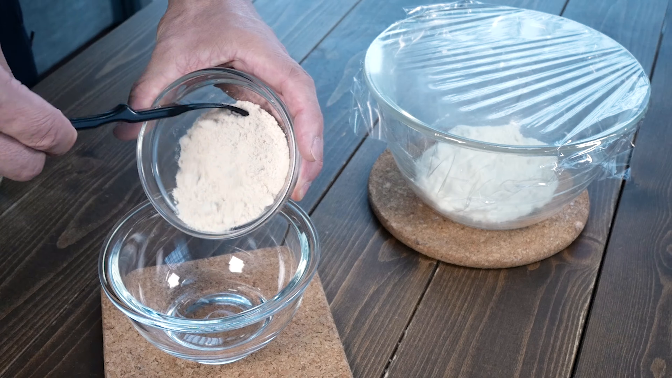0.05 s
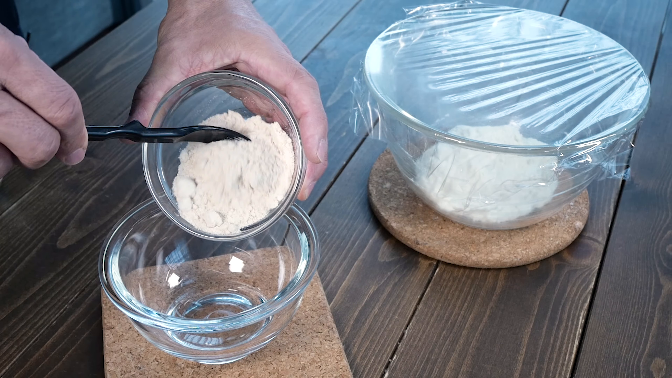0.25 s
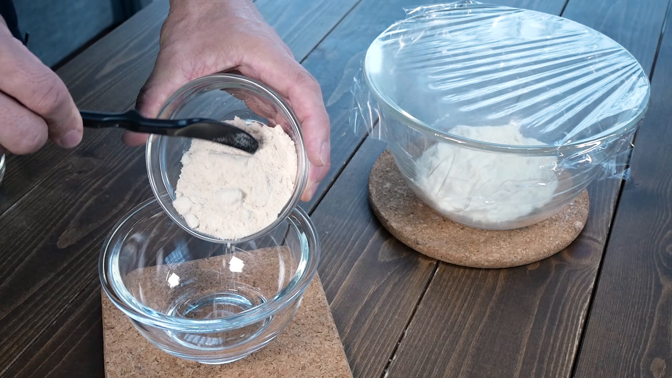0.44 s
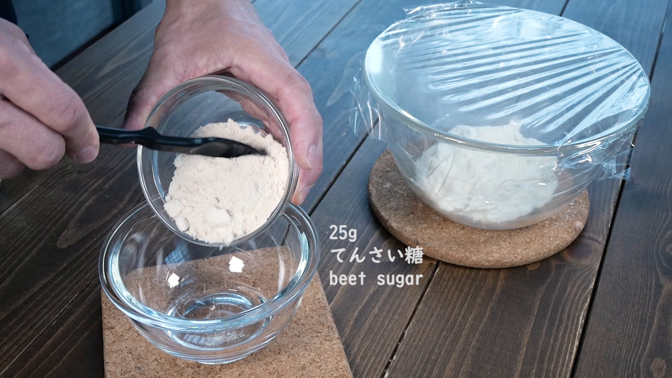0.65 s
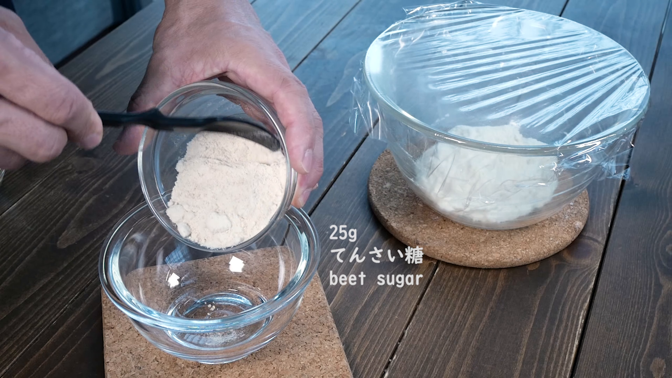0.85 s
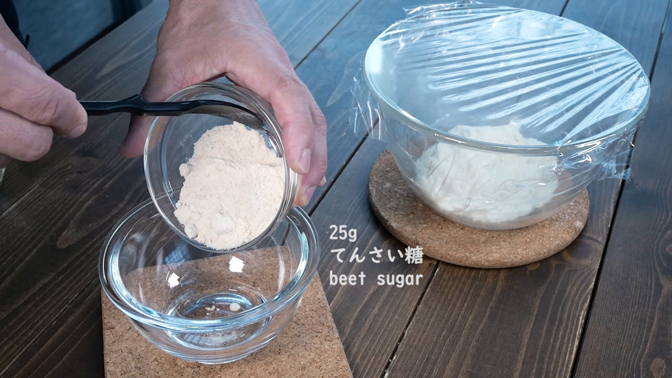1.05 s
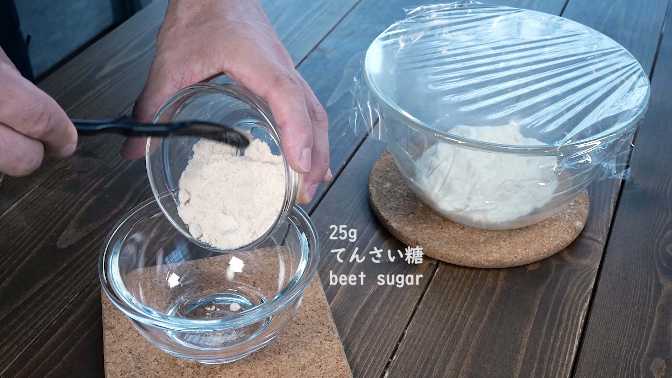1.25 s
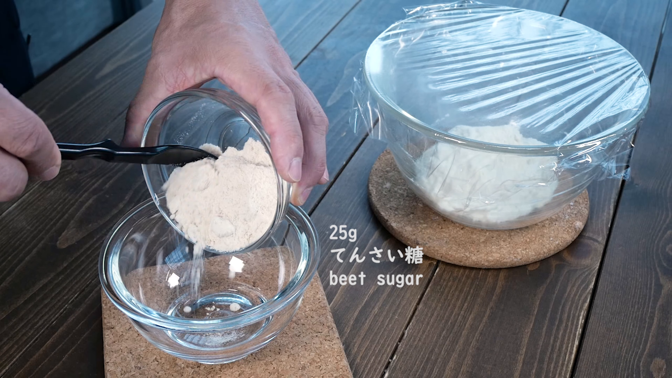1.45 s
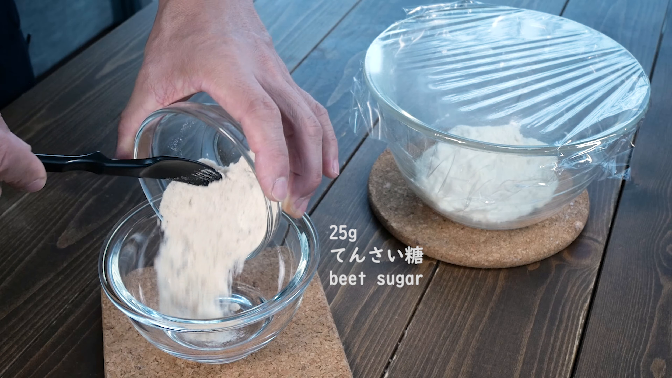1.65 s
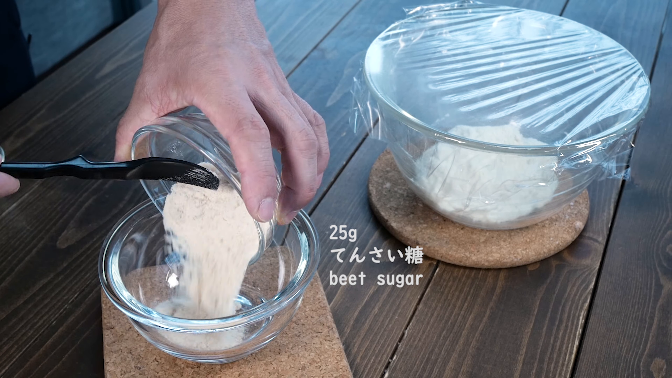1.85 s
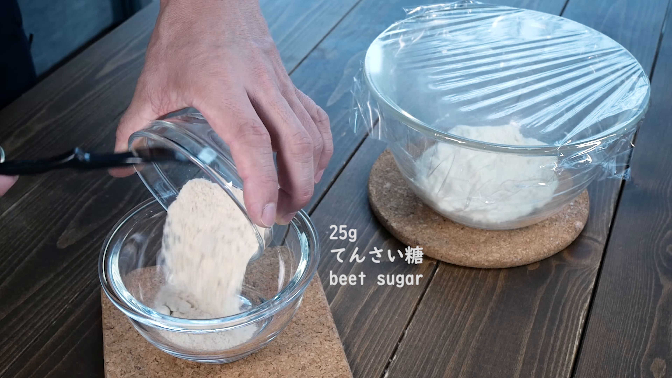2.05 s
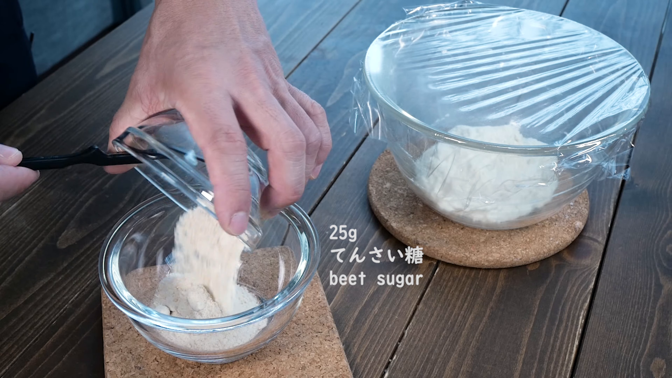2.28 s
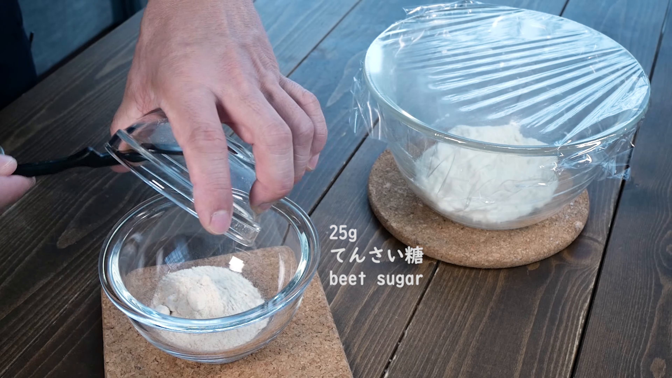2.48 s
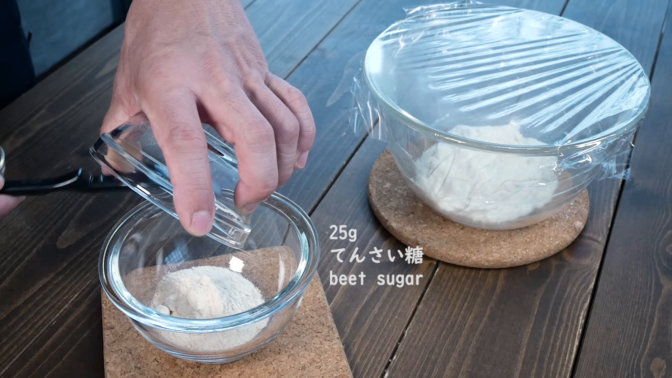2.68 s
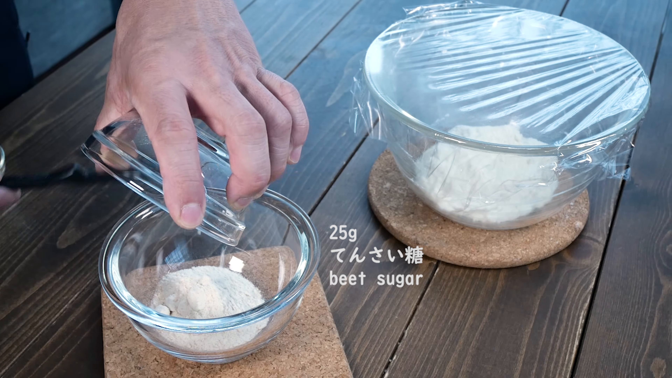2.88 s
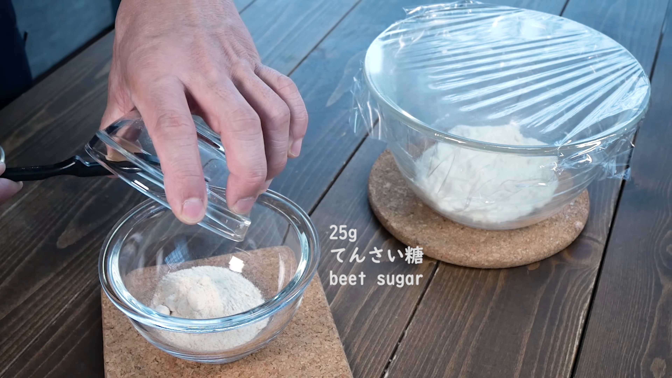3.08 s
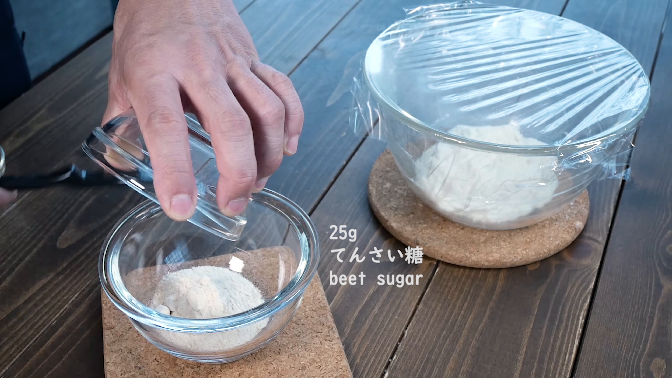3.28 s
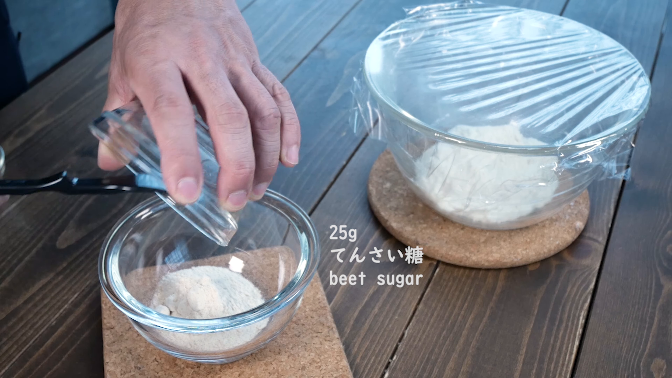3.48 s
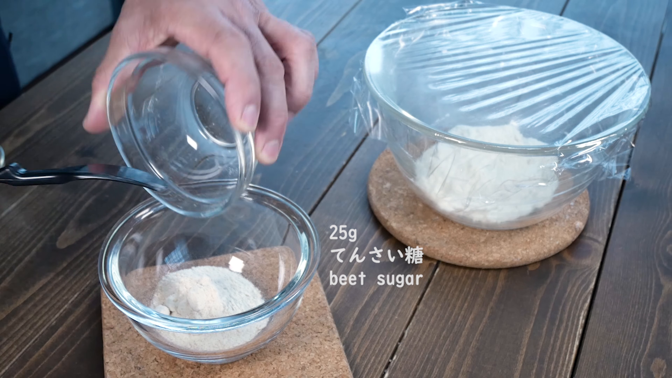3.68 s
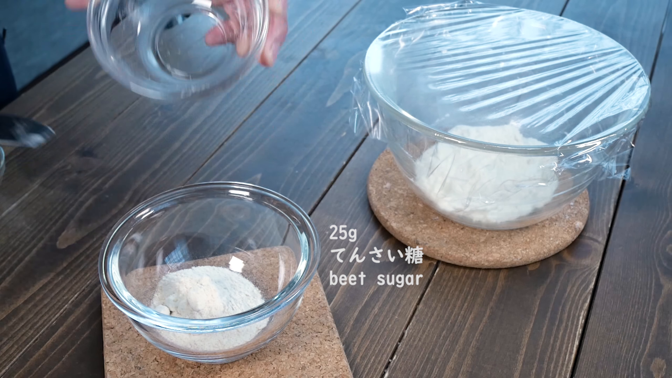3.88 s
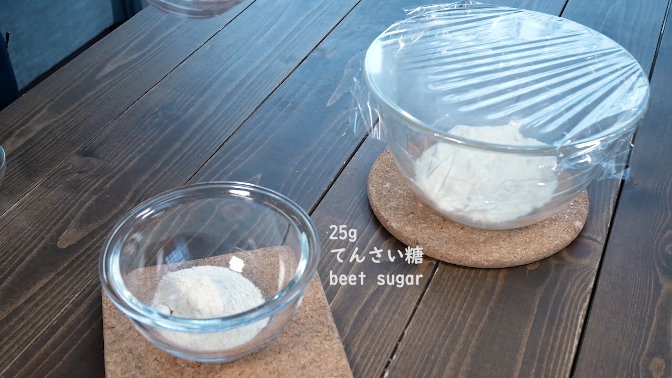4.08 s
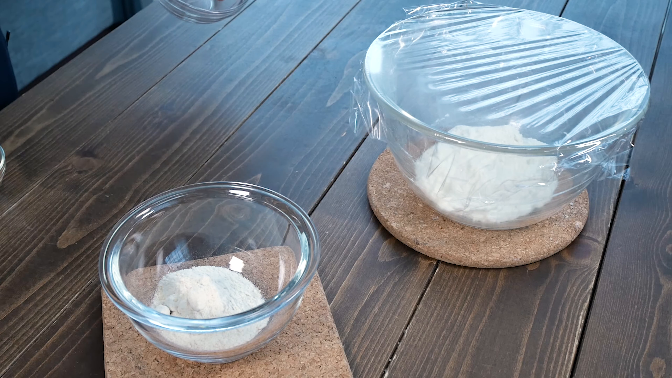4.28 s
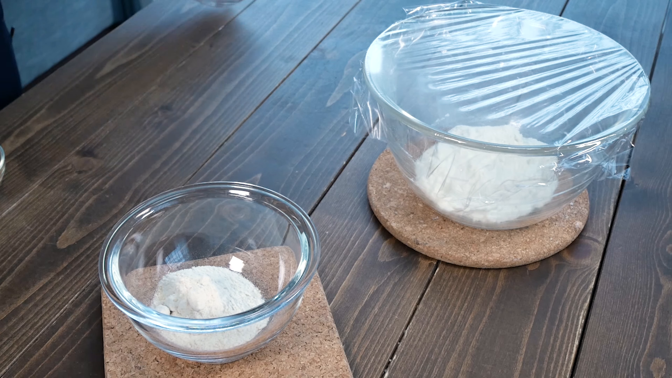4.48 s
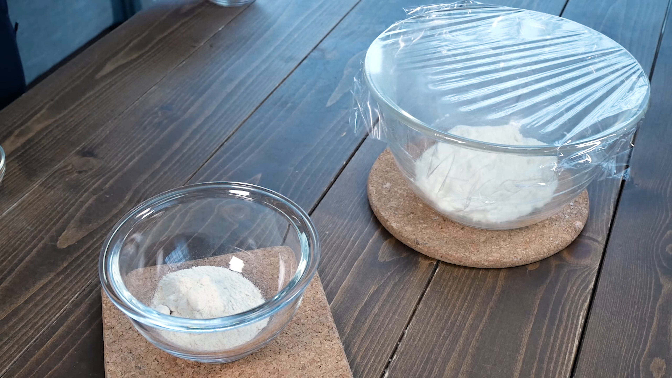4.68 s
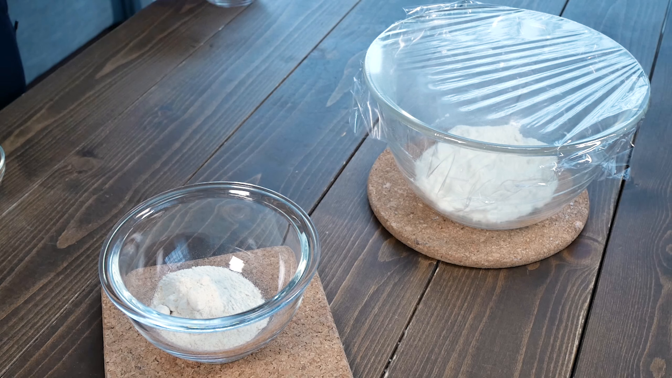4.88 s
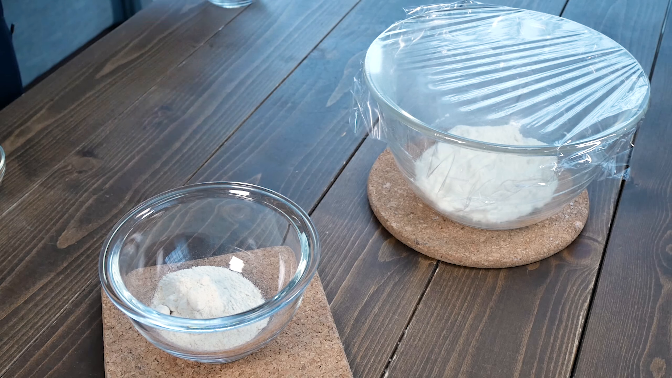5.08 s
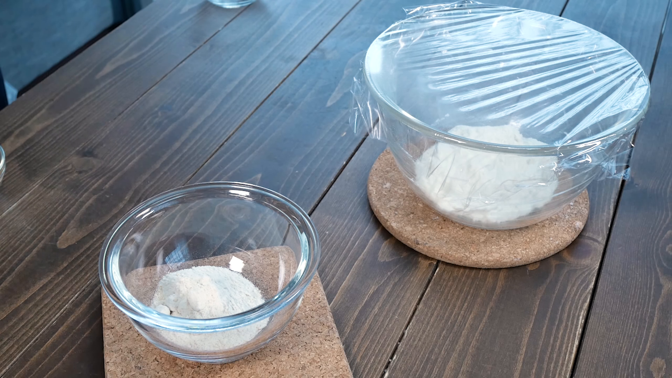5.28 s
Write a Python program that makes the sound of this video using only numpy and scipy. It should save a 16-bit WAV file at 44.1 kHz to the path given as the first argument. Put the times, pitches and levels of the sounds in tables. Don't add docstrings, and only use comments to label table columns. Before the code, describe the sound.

Gritty hissing scrapes and tiny high ticks on glass, nine or so bright clinking raps, a quiet gap, then a cup set on a wooden table.

```python
import sys
import numpy as np
from scipy import signal
from scipy.fft import rfft, irfft
from scipy.io import wavfile

SR = 44100
rng = np.random.default_rng(int(sys.argv[2]) if len(sys.argv) > 2 else 0)


def voltage_ratio(decibels):
    exponent = np.asarray(decibels, float) / 20
    return 10 ** exponent


def generate_wav(sig):
    pcm = np.round(np.clip(np.atleast_2d(sig).T, -1, 1) * 32767).astype(np.int16)
    wavfile.write(sys.argv[1], SR, pcm)


N = 235173


def rms_one(x):
    return x / np.sqrt(np.mean(x ** 2) + 1e-20)


def at_hz(points, hz):
    point_hz, value = np.transpose(points)
    return np.interp(np.log(hz + 1), np.log(point_hz), value)


def colour(x, spectrum):
    gain = voltage_ratio(at_hz(spectrum, np.fft.rfftfreq(len(x), 1 / SR)))
    return rms_one(irfft(rfft(x) * gain, len(x)))


def band(x, low_hz, high_hz):
    return signal.sosfilt(signal.butter(2, [low_hz, high_hz], "band", fs=SR, output="sos"), x)


def ring(clicks, hz, t60):
    shrink = voltage_ratio(-60 / (t60 * SR))
    turn = 2 * np.pi * hz / SR
    return signal.lfilter([0, np.sin(turn)], [1, -2 * shrink * np.cos(turn), shrink ** 2], clicks + 1e-18)


def strike(times, level_db, modes, spread_db, contact=0.8, alternate=False):
    at = (np.asarray(times) * SR).astype(int)
    out = np.zeros(N)
    chance = rng.standard_normal((len(at), len(modes)))
    for k, (hz, mode_db, t60) in enumerate(modes):
        sign = (-1) ** (k * alternate)
        clicks = np.zeros(N)
        clicks[at] = sign * voltage_ratio(level_db + mode_db + spread_db * chance[:, k])
        cycles = np.arange(int(contact * SR / hz) + 2) * hz / SR
        push = np.hanning(len(cycles)) * np.sin(2 * np.pi * cycles)
        pushes = signal.oaconvolve(clicks, 4 * push / len(push))[:N]
        out += ring(pushes, hz, t60)
    return out


def played(events, families, contact, longest=1, alternate=False):
    s, *levels = np.transpose(events)
    out = np.zeros(N)
    for level_db, modes in zip(levels, families):
        damped = [(hz, db, min(t60, longest)) for hz, db, t60 in modes]
        out += strike(s, level_db, damped, spread_db=3.0, contact=contact, alternate=alternate)
    return out


def grains(per_s, size_db):
    sizes = voltage_ratio(size_db * np.minimum(rng.exponential(1, N), 4)) * rng.choice([-1, 1], N)
    return rms_one(sizes * (rng.random(N) < per_s / SR))


def spells(rows, rise, fall):
    t = np.arange(N) / SR
    start, end = np.array(rows)[:, :2].T[:, :, None]
    return voltage_ratio(-rise * np.clip(start - t, 0, 2) - fall * np.clip(t - end, 0, 2))


def summed(gains, level_db):
    return np.sqrt(voltage_ratio(2 * np.asarray(level_db)) @ gains ** 2)


# (pitch [Hz], level [dB])
AIR = [(12, -26.5), (20, -13), (174, -9.5), (224, -3.5), (265, -11), (289, -9.5), (535, -6), (1140, -10),
       (1240, -13.5), (1350, -14.5), (3060, -27.5), (3320, -26.5), (4790, -28.5), (15200, -33),
       (16500, -35)]


def air():
    return voltage_ratio(-56.5) * colour(rng.standard_normal(N), AIR)


# (pitch [Hz], level [dB per Hz])
CRACK = [(500, -24), (1200, -4.5), (2500, 4.5), (5000, 0.5), (8500, 1), (11000, -13), (15000, -14),
         (16300, -45)]


def cracks(times, level_db):
    crack = np.zeros(N)
    t = np.arange(600) / SR
    for s, db in zip(times, level_db):
        burst = 3 * (t == 0) + rng.standard_normal(len(t)) * np.exp(-t / 0.0011)
        crack[int(s * SR):][:len(t)] += voltage_ratio(db + 16.5) * burst
    edge = colour(np.eye(1, 512, 256)[0], CRACK) / np.sqrt(512)
    sudden = signal.minimum_phase(np.convolve(edge, edge[::-1]))
    return signal.oaconvolve(crack, sudden)[:N]


# (time [s], glass level [dB], upper modes against the first [dB], crack level [dB])
TOUCHES = [
    (0.021, -71, 6, -65),
    (0.3927, -77, 11.5, -65),
    (.8629, -71, 2, -51),
    (1.7529, -64, 9, -49),
    (1.8713, -57.5, 8, -58.5),
]
# (time [s], glass level [dB], upper modes against the first [dB], blade level [dB],
# blade turn [0 flat to 1 edge])
RAPS = [
    (2.1415, -27.5, -1.5, -25.5, -0.078),
    (2.3237, -34.5, -0.5, -31.5, -0.19),
    (2.5128, -17.5, -6.5, -18.5, 0),
    (2.6597, -55.5, 10.5, -37, 1),
    (2.6701, -37.5, -4, -43.5, -0.48),
    (2.816, -25.5, -31, -25, 0.8),
    (2.9633, -21.5, -16.5, -21, 0.79),
    (3.1367, -16, -19.5, -15, 0.77),
    (3.2984, -12, -22.5, -18.5, 1.2),
    (3.4663, -23, -13, -20, 0.77),
]
# (pitch [Hz], level [dB], t60 [s])
CUP = [
    [(1768, 1, 0.041), (1780, -17, 0.035)],
    [(4044, 2, 0.049), (4092, -3.5, 0.1)],
    [(6890, 2.5, 0.053), (7056, 3.5, 0.081)],
    [(10660, 2, 0.033), (11160, -7.5, 0.035), (14850, -5, .04)],
]
UPPER_DB = [0, 0, -7, -19]
UPPER_FOLLOWS = [0, 0.9, 0.55, .8]


def glass():
    s, glass_db, upper_db = np.transpose([row[:3] for row in TOUCHES + RAPS])
    rim_db = glass_db[:, None] + UPPER_DB + np.outer(upper_db, UPPER_FOLLOWS)
    touch_crack_db = [row[3] for row in TOUCHES]
    rap_crack_db = rim_db[len(TOUCHES):, 2] - 6.5
    crack = cracks(s, np.r_[touch_crack_db, rap_crack_db])
    return played(np.c_[s, rim_db], CUP, contact=2.3) + crack


# (time [s], peak level [dB], centre pitch [Hz], length [s])
LUMPS = [(0.035, -48.5, 1850, 0.0038), (0.049, -40, 1850, .004), (.062, -38, 3800, .002),
         (0.0704, -27, 3800, 0.0014), (0.077, -47, 1830, .005), (.139, -35, 1330, .005),
         (.167, -33, 1300, .0025), (.1785, -36, 1400, .004), (.186, -37, 1320, .005),
         (0.276, -39.5, 3600, 0.0055), (.2925, -37.5, 1700, 0.0028), (0.304, -47, 2500, 0.00091),
         (0.66, -54, 3930, 0.0032), (0.698, -43, 1790, .005), (0.727, -44, 1400, 0.0048),
         (.849, -42, 3000, .002), (0.9, -40.5, 1390, .004), (0.945, -46, 1280, .005),
         (1.215, -39.5, 3800, .003), (1.2845, -59, 2000, 0.0023), (1.394, -48, 2500, 0.0015),
         (1.4705, -37.5, 3820, 0.0029), (1.79, -59, 1650, 0.0034), (1.8365, -57, 3000, .002),
         (1.95, -61, 3000, .002), (2.063, -61, 3000, .002), (2.1, -58, 3000, 0.0013),
         (2.364, -53, 3970, 0.0026)]


def lumps():
    out = np.zeros(N)
    t = np.arange(2000) / SR
    for s, peak_db, hz, length in LUMPS:
        grit = rng.standard_normal(len(t)) * t / length * np.exp(-t / length)
        crackle = band(grit, 1800, 7500) + voltage_ratio(-6) * band(grit, 9500, 15800)
        crackle_db = -3 + 6 * np.log2(hz / 2000)
        sound = 3 * band(grit, hz / 1.06, hz * 1.13) + voltage_ratio(crackle_db) * crackle
        out[int((s - length / 2) * SR):][:len(t)] += voltage_ratio(peak_db) * sound / np.abs(sound).max()
    return out


# (start [s], end [s], hiss level [dB], low crunch against hiss [dB])
STROKES = [(0.068, 0.066, -44.5, 3), (.139, 0.14, -73, 6), (0.184, 0.177, -62.5, 16),
           (0.223, 0.307, -56.5, 7.5), (0.458, 0.465, -62.5, -2), (0.665, 0.714, -52, -0.5),
           (0.859, 0.95, -51.5, -4.5), (1.108, 1.115, -64, -5), (1.202, 1.239, -50, -2.5),
           (1.43, 1.525, -55, -2), (1.625, 1.74, -61, 3.5), (1.747, 1.748, -49.5, -1.5),
           (1.798, 1.937, -58.5, -0.5), (2.02, 2.14, -65, -1)]
# (pitch [Hz], level [dB per Hz])
SUGAR = [(1290, -57), (2200, -23), (2620, 0), (3220, -6), (3710, -2.5), (4380, -5), (4920, -3.5),
         (8730, -4.5), (10200, -16.5), (13900, -6), (16000, -21)]
# (start [s], end [s], second mode level [dB], third mode level [dB])
SING = [
    (.37, 0.408, -78, -63.5),
    (.87, 0.943, -58, -79),
    (1.42, 1.478, -62, -64),
    (1.537, 1.6, -65, -68),
    (1.663, 1.748, -61, -71),
    (1.86, 1.904, -64, -72),
    (1.98, 2.104, -67.5, -64),
]
# (pitch [Hz], level [dB], t60 [s])
SINGING = [
    [(4030, 1.5, 0.033), (4105, -1, 0.069)],
    [(6960, 8.5, 0.025)],
]


def scrape():
    strokes = spells(STROKES, rise=1060, fall=280)
    _, _, hiss_db, crunch_db = np.transpose(STROKES)
    hiss = summed(strokes, hiss_db - 3.5) * colour(grains(5000, size_db=5.0), SUGAR)
    crunching = rms_one(band(grains(1900, size_db=4.5), 880, 2300))
    crunch = summed(strokes, hiss_db + crunch_db - 7.5) * crunching
    push = grains(400, size_db=0)
    sliding = spells(SING, rise=430, fall=430)
    singing = np.zeros(N)
    for level_db, modes in zip(np.transpose(SING)[2:], SINGING):
        pushed = summed(sliding, level_db) * push
        for hz, db, t60 in modes:
            singing += voltage_ratio(db - 24.5) * ring(pushed, hz, t60)
    return hiss + crunch + band(singing, 3000, 9000)


# (time [s], level [dB], 11.8 kHz mode against the 11.3 kHz one [dB])
TICKS = [(0.524, -61, 10), (.545, -48.5, -2), (0.625, -50, 2), (0.735, -61, 4), (0.8608, -38, 14.5),
         (0.947, -69, -9), (1.1218, -64, -8), (1.393, -55.5, -1), (1.4306, -50.5, -2), (1.482, -57, -10),
         (1.5348, -57, -14), (1.562, -61, 3), (1.5895, -49, -6), (1.643, -49, 0), (1.6736, -48.5, -2),
         (1.6985, -65, -8), (1.722, -56, 5), (1.7483, -53, 4), (1.7898, -60, 4), (1.8362, -56, -2),
         (1.8711, -64, 4)]
# (start [s], end [s], level [dB])
RUB = [
    (.72, .82, -68),
    (1.1, 1.15, -79),
    (1.58, 1.72, -75),
    (1.955, 1.98, -75),
]
# (time [s], level [dB])
HANDLE = [
    (2.9627, -53.5),
    (3.1362, -51),
    (3.2979, -58),
    (3.4655, -44),
]
# (pitch [Hz], level [dB], t60 [s])
SHANK = [
    [(11304, 0, .15)],
    [(11778, 0, .11)],
    [(14120, -1, .1), (14215, -4, .1), (14900, -6, .15), (13245, -12, .1)],
]


def shank():
    push = summed(spells(RUB, rise=55, fall=75.3), [row[2] for row in RUB]) * grains(395, size_db=-8.5)
    rub = np.zeros(N)
    for modes in SHANK:
        for hz, db, t60 in modes:
            rub += voltage_ratio(db - 30) * ring(push, hz, t60)
    s, db, lean_db = np.transpose(TICKS)
    tipped_db = np.where(s > 1.3, 0, -9)
    top_db = db + 0.93 * lean_db + tipped_db
    ticks = played(np.c_[s, db, db + lean_db, top_db], SHANK, contact=8.0, longest=0.16)
    return ticks + played(HANDLE, SHANK, contact=4.0) + band(rub, 8200, 15400)


# (time [s], level [dB])
BOWL_HIT = (1.751, -54.5)
# (pitch [Hz], level [dB], t60 [s])
BOWL = [(1631, 3.1, 0.93), (1040, 20, 0.02), (116, 9.4, 0.072)]


def landing():
    s, level_db = BOWL_HIT
    return strike([s], level_db, BOWL, spread_db=4.5)


# (time [s], level [dB])
TRICKLE = [
    (1.84, -81),
    (1.98, -78),
    (2.186, -79),
    (2.51, -86),
]


def trickle():
    t = np.arange(N) / SR
    s, level_db = np.transpose(TRICKLE)
    falling = voltage_ratio(np.interp(t, s, level_db)) * (t > s[0]) * (t < s[-1])
    return falling * voltage_ratio(12.5) * rms_one(band(grains(2500, size_db=4.0), 6840, 19100))


# (pitch [Hz], level [dB], t60 [s])
BLADE = [
    [(1297, 3, .009), (1573, -2, 0.0062)],
    [(400, -7.5, 0.015), (754, 5.5, 0.006)],
    [(1710, -4, 0.0063), (2058, 0, 0.0079)],
    [(2820, 4, 0.014), (3080, 5, 0.014), (3410, -4, 0.014)],
    [(3892, 2, 0.012), (4450, 5, 0.0058), (5600, -3, 0.0088), (6150, -2.5, 0.0021), (8500, -21, .004),
     (12430, -11.5, 0.0037)],
]
FLAT_DB = [-17, -13.5, 8, -10.5, -2.5]
EDGE_DB = [-2.5, -24, -22, -8, -6]


def blade():
    s, _, _, blade_db, turned = np.transpose(RAPS)
    humps_db = blade_db[:, None] + np.outer(1 - turned, FLAT_DB) + np.outer(turned, EDGE_DB)
    return played(np.c_[s, humps_db], BLADE, contact=1.9, longest=.016, alternate=True)


def rattle():
    out = np.zeros(N)
    t = np.arange(6000) / SR
    for s, _, _, blade_db, turned in RAPS:
        level_db = blade_db + np.interp(turned, [0, 1], [-19, -13.5])
        out[int(s * SR):][:len(t)] += voltage_ratio(level_db) * rng.standard_normal(len(t)) * np.exp(-t / 0.035)
    return band(out, 1800, 7400) + voltage_ratio(-15) * band(out, 7000, 15000)


# (start [s], end [s], level [dB])
SLEEVE = [
    (4.03, 4.081, -61),
    (4.77, 4.805, -64),
    (5.22, 5.26, -67),
]


def sleeve():
    moving = summed(spells(SLEEVE, rise=70, fall=54), [row[2] for row in SLEEVE])
    return moving * colour(rng.standard_normal(N), SUGAR)


# (time [s], peak level [dB])
SET_DOWN = [
    (4.768, -7.5),
    (4.787, -17.5),
    (4.809, -16.5),
]
# (time [s], peak level [dB])
ROCKING = [
    (4.883, -37),
    (4.921, -25),
    (4.933, -40),
]
# (time [s], level [dB])
FREED = [
    (5.02, -63),
    (5.052, -59),
    (5.065, -59.5),
]
# (pitch [Hz], level [dB], t60 [s])
KNOCK = [(388, 0.5, 0.019), (684, -18, 0.0095), (1050, -15, 0.017), (1340, -25, 0.0073),
         (1710, -32, 0.0093), (2050, -41, 0.01), (3000, -23, 0.0063), (4450, -30, 0.0037)]
# (pitch [Hz], level [dB], t60 [s])
TABLE = [(151, -8, 0.063), (228, -16, 0.13), (315, -9, 0.11), (360, -6, 0.16), (393, -3, 0.12),
         (517, -4.5, 0.12), (615, -14, 0.12), (641, -3.5, 0.13), (688, -2, 0.091), (766, -15, 0.18),
         (876, -7, 0.053), (980, -11.5, 0.056), (1043, -3, 0.033), (1108, -18.5, 0.12), (1200, -15, 0.039),
         (1318, -27, 0.22), (1390, -16.5, 0.052), (1566, -18, 0.067), (1730, -21, 0.076),
         (1870, -24, 0.065), (2180, -26.5, 0.038), (2440, -30, .03)]
# (pitch [Hz], level [dB], t60 [s])
FREE_CUP = [(1820, 2, 0.19), (4070, -6, .12), (7040, -6, .12)]


def table():
    s, peak_db = np.transpose(SET_DOWN)
    foot = strike(s[:1], peak_db[0] - 5, KNOCK, spread_db=1, contact=1.8)
    top = strike(s, peak_db - 11.5, TABLE, spread_db=2.5, contact=3.2)
    low_modes = [(hz, db, 0.61 * t60) for hz, db, t60 in TABLE[1:6]]
    rocking = voltage_ratio(-4.5) * played(ROCKING, [low_modes], contact=1.9)
    return foot + top + rocking + played(FREED, [FREE_CUP], contact=14.0)


# (pitch [Hz], t60 [s])
ROOM_T60 = [(200, 0.48), (1000, 0.24), (3000, 0.27), (8000, 0.24), (16000, 0.053)]


def room(x):
    t = np.arange(SR // 2) / SR
    tail = np.zeros(len(t))
    white = rng.standard_normal((2, len(t)))
    edges = 100 * 2 ** np.arange(0, 7.6, .5)
    for k, (low, high) in enumerate(zip(edges, edges[1:])):
        tail += band(white[k % 2], low, high) * voltage_ratio(-60 * t / at_hz(ROOM_T60, low))
    early = voltage_ratio(6.5 - 60 * t / 0.071)
    tail *= (1 + early) * np.clip(t / .0045 - 1, 0, 1)
    return signal.fftconvolve(x, tail / np.sqrt(np.sum(tail ** 2)))[:N]


# (pitch [Hz], level [dB per Hz])
SIDE_HISS = [(12, -39.5), (20, -9), (729, -6.5), (1140, -12), (1790, -10.5), (14700, -7.5), (16500, -19)]


def scene():
    slap = blade()
    to_walls = voltage_ratio(-3.5)
    near = glass() + lumps() + scrape() + shank() + landing() + trickle() + rattle() + table()
    near += to_walls * slap
    mid = near + (1 - to_walls) * slap + voltage_ratio(-8.5) * room(near) + sleeve() + air()
    side = voltage_ratio(-34) * band(room(near), 700, 16000)
    side += voltage_ratio(-73) * colour(rng.standard_normal(N), SIDE_HISS)
    return np.array([mid + side, mid - side])


def top_cut(x):
    return signal.sosfilt(signal.butter(12, 16640, fs=SR, output="sos"), x)


def record(dry):
    steep = signal.cheby2(8, 40, 16700, fs=SR, output="sos")
    mix = signal.sosfilt(steep, band(dry, 58, 18000))
    return top_cut(mix)


dry = scene()
out = record(dry)
generate_wav(out)
```